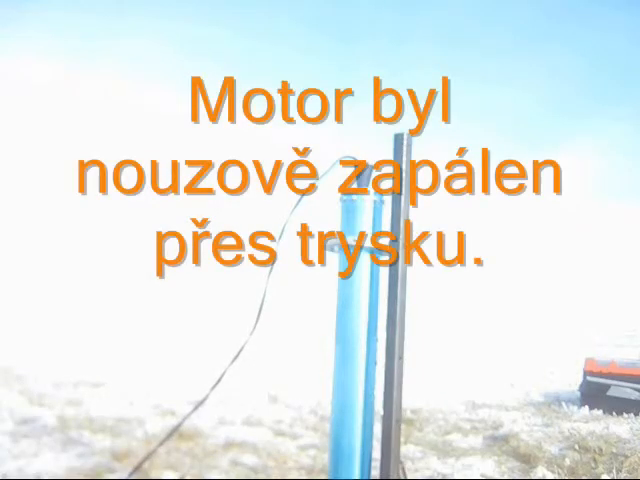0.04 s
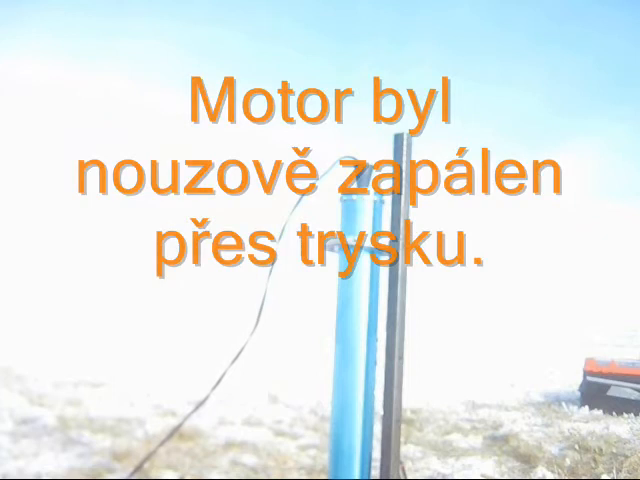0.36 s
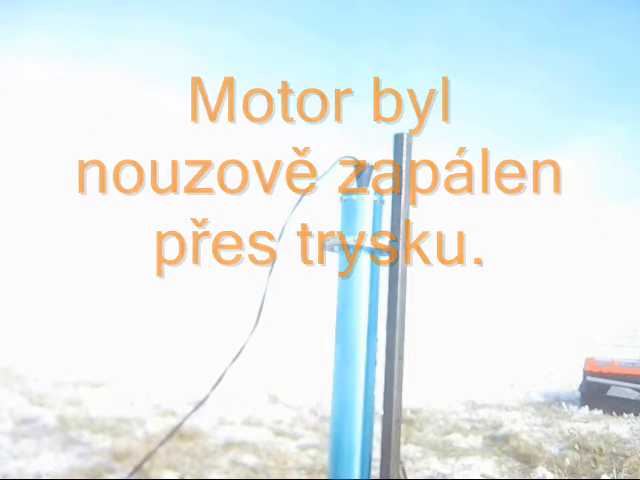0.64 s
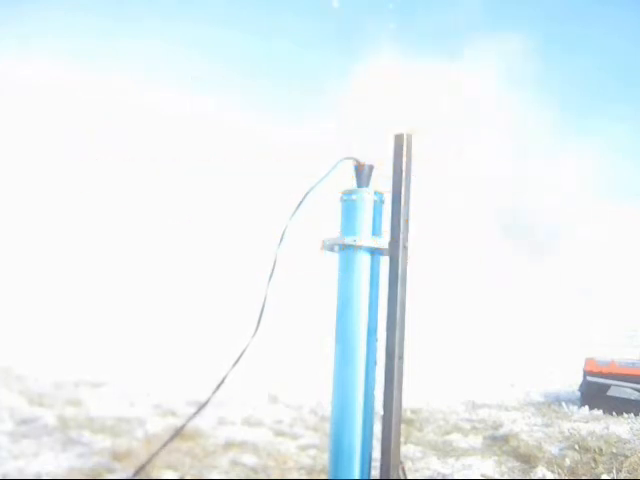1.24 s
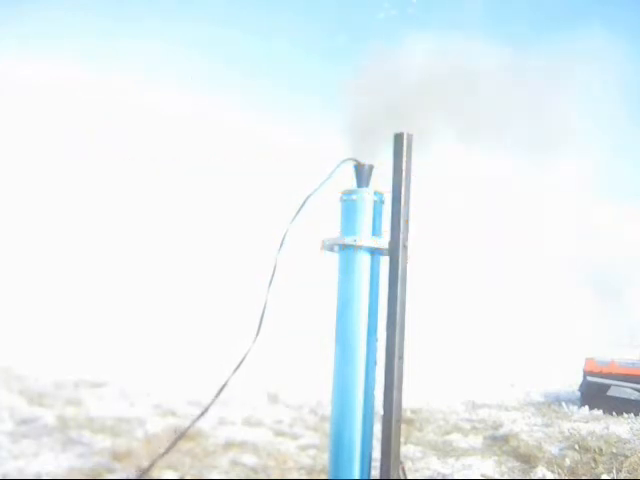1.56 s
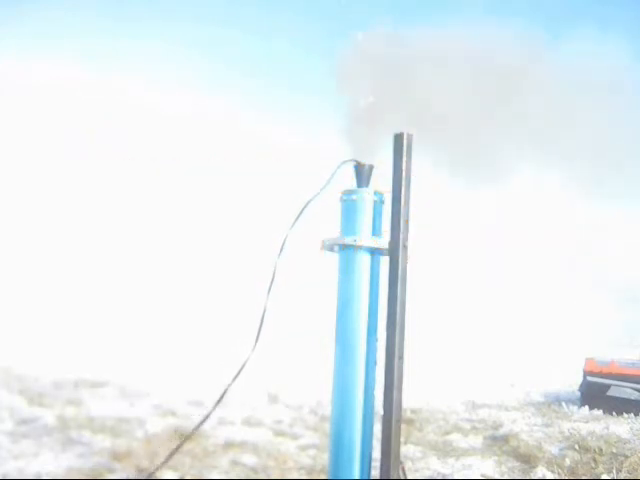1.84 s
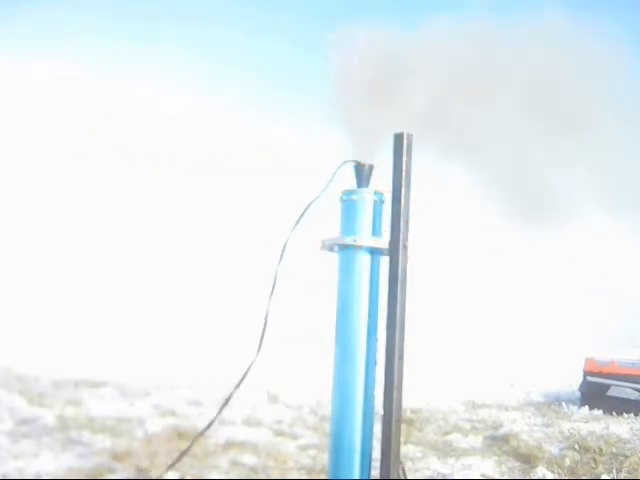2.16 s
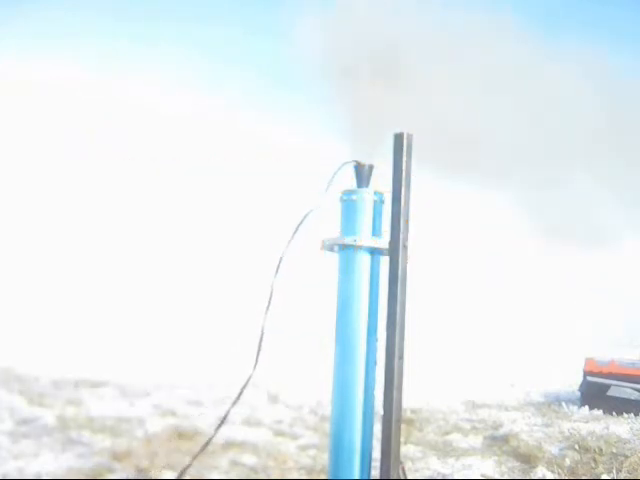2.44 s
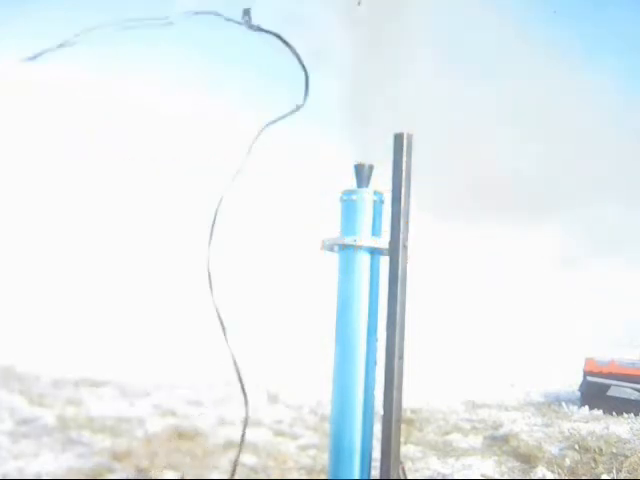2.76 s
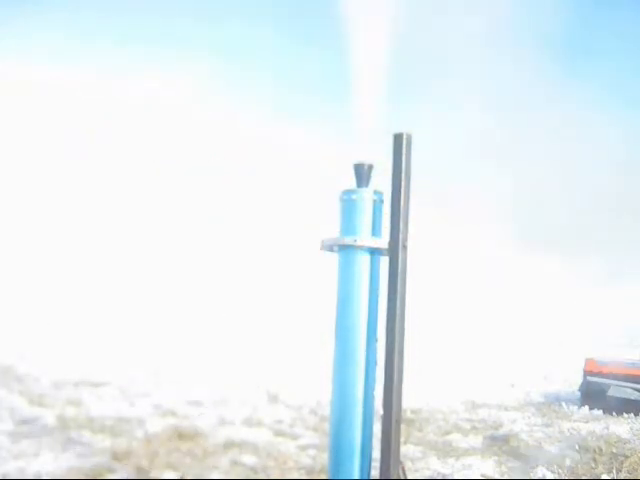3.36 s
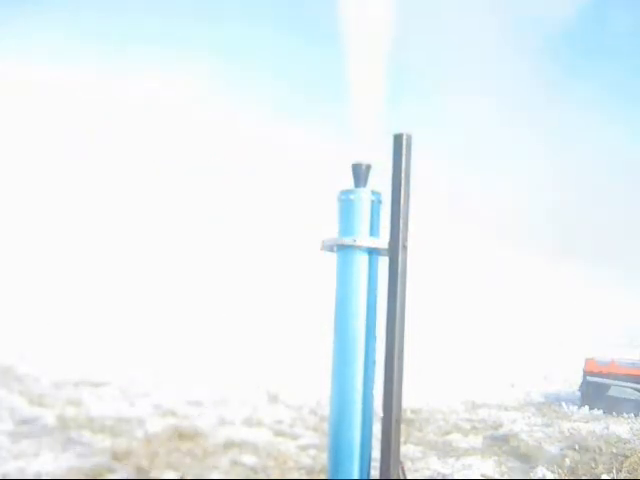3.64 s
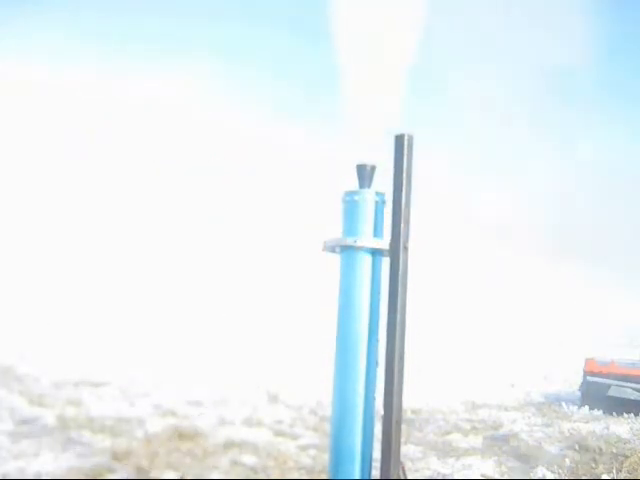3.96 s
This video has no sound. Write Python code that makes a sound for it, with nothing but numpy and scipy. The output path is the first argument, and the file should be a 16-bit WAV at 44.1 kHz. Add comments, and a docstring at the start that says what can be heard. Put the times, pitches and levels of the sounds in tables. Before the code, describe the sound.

A small rocket motor lights close to the microphone outdoors. After faint wind and a soft hollow rush, it thumps, sputters and crackles with sharp snaps, then hisses harder and opens into a loud, smooth roar.

```python
"""On an outdoor test stand, in a light wind, a small solid rocket motor lights close to a mono camera.
The igniter rushes softly inside the case. Gas breaks out with a thump, then spits and sputters through
the half-blocked nozzle with a low flutter. It hisses harder as the igniter wire is blown out, and opens
into a full, smooth jet. Most layers are noise, given a tone by one table and a loudness by another."""
import sys
import numpy as np
from scipy import signal
from scipy.fft import rfft, irfft
from scipy.io import wavfile
from scipy.ndimage import uniform_filter1d

SR = 44100
rng = np.random.default_rng(int(sys.argv[2]) if len(sys.argv) > 2 else 0)


def master(y):
    """Save y as 16-bit WAV."""
    cut = np.clip(np.atleast_2d(y).T, -1, 1)
    pcm = np.round(cut * 32767)  # scale
    wavfile.write(sys.argv[1], SR, pcm.astype(np.int16))


N = 176400
TIME = np.arange(N) / SR
HZ = np.maximum(np.arange(N // 2 + 1) * SR / N, 1)


def undb(db):
    """Turn decibels into a number to multiply by."""
    return 10 ** (np.asarray(db) / 20)


def unit(x):
    """Scale a signal to a standard strength (rms 1)."""
    return x / np.std(x)


def curve(rows):
    """Loudness that follows (time_s, level_db) rows and fades by 200 dB a second outside them."""
    times, levels_db = np.array(rows, float).T
    outside_s = np.abs(TIME - np.clip(TIME, times[0], times[-1]))
    return undb(np.interp(TIME, times, levels_db) - 200 * outside_s)


def swell(peak_s, rise_db_per_s, fall_db_per_s, hold_s=0):
    """Loudness that rises to 1 at peak_s, stays there for hold_s, then falls."""
    before_s = np.maximum(peak_s - TIME, 0)
    after_s = np.maximum(TIME - peak_s - hold_s, 0)
    return undb(-rise_db_per_s * before_s - fall_db_per_s * after_s)


def colour(x, tone, resonances=()):
    """Filter a sound by (pitch_hz, gain_db) rows, adding a peak for each resonance."""
    pitches, gains_db = np.array(tone, float).T
    shape_db = np.interp(np.log(HZ), np.log(pitches), gains_db)
    for pitch_hz, width_hz, lift_db in resonances:
        shape_db += lift_db / (1 + (2 * (HZ - pitch_hz) / width_hz) ** 2)
    # Folding the cepstrum makes the filter ring after a click, never before it.
    cepstrum = irfft(np.log(undb(shape_db)), N)
    cepstrum[1:N // 2] *= 2
    cepstrum[N // 2 + 1:] = 0
    return irfft(rfft(x) * np.exp(rfft(cepstrum)), N)


def wobble(spread_db, rate_hz):
    """Loudness that wanders smoothly up and down at random."""
    window = max(int(SR / rate_hz), 1)
    smoothed = uniform_filter1d(rng.standard_normal(N), window)
    return undb(spread_db * unit(uniform_filter1d(smoothed, window)))


def rush(tone, resonances=()):
    """Swirling air: noise with the given tone, at standard strength."""
    return unit(colour(rng.standard_normal(N), tone, resonances))


# Tone of the background hiss: pitch_hz, gain_db
HISS_TONE = [(40, 10.5), (350, 5), (1100, -0.5), (2000, 1), (3100, -1.5), (5000, -2.5), (8000, -7.5),
             (9700, -13)]
# Narrow peaks that whine in the hiss: pitch_hz, width_hz, lift_db
WHINE_PEAKS = [(3050, 60, 8), (3195, 60, 7.5), (7850, 60, 8), (7990, 60, 8), (10350, 160, 13.5)]

def background_hiss():
    """A faint, steady hiss with a thin whine in it."""
    return undb(-49.5) * rush(HISS_TONE, WHINE_PEAKS)


# Strength of the gusts: time_s, level_db
GUST_LEVELS = [(0, -52), (.08, -43), (.2, -46.5), (.27, -37), (.33, -47), (.45, -49.5), (.57, -37.5),
               (.71, -37), (.77, -45.5), (.83, -35.5), (.88, -35), (.92, -39), (.97, -29.5), (1.02, -43)]
# Tone of the wind's rumble: pitch_hz, gain_db
WIND_TONE = [(20, -8), (45, 5), (72, 2), (150, -4.5), (280, -20), (500, -18.5), (1500, -38), (10000, -85)]

def wind(lull_s=1.2, lull_db=-59):
    """Gusts buffet the microphone, then settle into a lull."""
    gusts = curve(list(GUST_LEVELS) + [(lull_s, lull_db), (N / SR, lull_db)])
    return gusts * rush(WIND_TONE)


# Strength of the burning inside the case: time_s, level_db
IGNITER_LEVELS = [(0, -53.5), (.12, -48), (.25, -45.5), (.37, -47.5), (.44, -51.5), (.62, -56),
                  (.69, -46.5), (.76, -56), (.85, -44.5), (1.0, -37.5), (1.44, -38.5), (1.53, -34),
                  (1.59, -39), (1.66, -33), (1.8, -39.5), (2.0, -41.5), (2.13, -44), (2.3, -36.5),
                  (2.58, -45), (2.8, -39), (3.05, -41)]
# Small puffs from the igniter: peak_s, level_db
IGNITER_PUFFS = [(0.713, -37.5), (0.787, -40.5), (0.916, -34.5), (1.072, -20.5)]
# Hollow tone of the burning: pitch_hz, gain_db
IGNITER_TONE = [(200, -32), (400, -18.5), (520, -3.5), (650, 1.5), (800, -5.5), (1100, -17), (2500, -27),
                (10000, -58)]

def igniter():
    """The igniter burns inside the case with a hollow rush and a few puffs."""
    puffs = sum(undb(level_db) * swell(peak_s, rise_db_per_s=4000, fall_db_per_s=503)
                for peak_s, level_db in IGNITER_PUFFS)
    return np.hypot(curve(IGNITER_LEVELS), puffs) * rush(IGNITER_TONE)


# Tone of the fuel catching fire: pitch_hz, gain_db
CATCH_TONE = [(150, -6), (600, -6), (1200, -1), (2300, -2.5), (3400, -6), (5000, -29), (8000, -11.5),
              (10500, -12.5)]

def fuel_catching():
    """The solid fuel catches with a rush that swells until the nozzle starts to spit."""
    return undb(-35) * swell(peak_s=1.045, rise_db_per_s=65, fall_db_per_s=250) * rush(CATCH_TONE)


THUMP_AGE_S = np.maximum(TIME - 1.037, 0)  # time since the gas broke out
# Tone of the first bark of gas: pitch_hz, gain_db
BARK_TONE = [(100, 3), (300, 5), (800, 1), (1800, -11), (3000, -6), (6000, -21), (10000, -19)]

def thump(pitch_hz=101, decay_s=0.006):
    """Gas first breaks out with one fast-dying swing of pressure and a short bark."""
    swing = -np.sin(2 * np.pi * pitch_hz * THUMP_AGE_S) * np.exp(-THUMP_AGE_S / decay_s)
    bark = swell(peak_s=1.032, rise_db_per_s=3000, fall_db_per_s=900) * rush(BARK_TONE)
    return undb(-13.5) * swing + undb(-21) * bark


# Tone of the low flutter: pitch_hz, gain_db
FLUTTER_TONE = [(25, -16), (45, -10), (65, 2), (100, 1.5), (160, 0.5), (230, -6), (380, -17), (480, -9),
                (640, -8), (800, -22.5), (1500, -31), (10000, -60)]
# Deeper tone just before it chokes off: pitch_hz, gain_db
CHOKE_TONE = [(25, -18), (55, -9), (76, 3), (110, -7), (200, -22), (1000, -58), (10000, -90)]

def chuffing(growth_db_per_s=2.5, fall_db_per_s=481):
    """The first unsteady burning flutters low, deepens, and chokes off with one last puff."""
    slopes = dict(rise_db_per_s=1500, fall_db_per_s=fall_db_per_s)
    burning = swell(peak_s=1.033, hold_s=0.368, **slopes)
    last_puff = undb(-7.5) * swell(peak_s=1.463, **slopes)
    growth = undb(growth_db_per_s * THUMP_AGE_S)
    flutter = growth * (burning + last_puff) * rush(FLUTTER_TONE)
    deepening = swell(peak_s=1.35, hold_s=0.051, rise_db_per_s=250, fall_db_per_s=fall_db_per_s)
    return undb(-27.5) * flutter + undb(-28.5) * deepening * rush(CHOKE_TONE)


# Tone of the crackle: pitch_hz, gain_db
CRACKLE_TONE = [(300, -10), (2200, -16.5), (3600, -1), (5200, 3), (7500, -3), (10000, -9)]

def crackle(clicks_per_s=1300, spread_db=1.5):
    """Tiny clicks of uneven size swell and fade in bunches."""
    sizes = undb(spread_db * np.minimum(rng.exponential(size=N), 4))
    fires = rng.random(N) < clicks_per_s / SR
    clicks = fires * sizes * np.sign(rng.standard_normal(N))
    return unit(colour(clicks * wobble(spread_db=3, rate_hz=70), CRACKLE_TONE))


# Strength of the gas flow through the half-blocked nozzle: time_s, level_db
FLOW_LEVELS = [(.93, -51), (1.0, -41), (1.025, -34.5), (1.035, -26), (1.07, -25), (1.085, -25),
               (1.105, -28.5), (1.125, -29), (1.19, -26), (1.25, -29.5), (1.3, -25.5), (1.36, -28.5),
               (1.413, -25), (1.42, -33.5), (1.48, -29.5), (1.535, -24.5), (1.56, -25), (1.585, -30.5),
               (1.65, -25), (1.69, -26.5), (1.72, -22.5), (1.79, -23), (1.83, -24.5), (1.92, -22.5),
               (1.965, -25.5), (1.99, -23), (2.06, -25.5), (2.26, -23), (2.295, -26.5), (2.33, -23.5),
               (2.54, -23.5), (2.565, -24), (2.605, -21.5), (2.65, -23), (2.72, -21.5), (2.755, -24),
               (2.78, -22), (2.84, -24.5), (2.95, -27.5), (3.15, -53)]
# Tone of that flow: pitch_hz, gain_db
FLOW_TONE = [(60, -20), (250, -16.5), (390, -18.5), (520, -10), (740, -4), (1020, -7.5), (1400, -4.5),
             (1800, -4.5), (2550, -4), (3500, -1), (4500, -6), (5500, -9.5), (6500, -7.5), (7500, -7),
             (8400, -10.5), (10500, -21)]
# Pitches at which gas rings in the nozzle and case: pitch_hz, width_hz, lift_db
NOZZLE_RINGS = [(690, 240, 3), (1440, 500, 4), (2154, 320, 5), (2970, 300, 1.5), (3854, 300, 5),
                (4410, 130, 5), (6580, 310, 3.5), (7200, 240, 7), (9020, 190, 4.5)]

def sputter():
    """Uneven gas and bunches of crackle make the half-blocked nozzle ring."""
    gas = unit(rng.standard_normal(N) * wobble(spread_db=1.1, rate_hz=297))
    flow = (gas + undb(-5) * crackle()) * wobble(spread_db=0.17, rate_hz=47.2)
    return curve(FLOW_LEVELS) * unit(colour(flow, FLOW_TONE, NOZZLE_RINGS))


# Single spits of slag (burnt fuel): start_s, level_db
SLAG_SPITS = [(1.0123, -11.5), (1.015, -14), (1.016, -16), (1.2115, -23), (1.711, -9), (2.0195, -30),
              (2.3437, -4), (2.644, -11), (2.7665, -9)]

def spits():
    """Bits of slag snap out, ringing the nozzle just as the gas does."""
    kicks = np.zeros(N)
    for start_s, level_db in SLAG_SPITS:
        kicks[int(start_s * SR)] += undb(level_db)
    snaps = colour(kicks, FLOW_TONE, NOZZLE_RINGS)
    return snaps * kicks.max() / np.abs(snaps).max()


# Strength of the hiss as the nozzle clears: time_s, level_db
CLEARING_LEVELS = [(2.78, -42), (2.84, -29.5), (2.885, -18), (2.95, -21.5), (2.98, -17.5), (3.1, -16),
                   (3.2, -16.5), (3.29, -19.5), (3.4, -26.5), (3.7, -45)]
# Bright tone of that hiss: pitch_hz, gain_db
CLEARING_TONE = [(60, -25), (300, -22), (700, -10), (950, -10), (1500, -5.5), (2150, -2.5), (2500, -4),
                 (3400, 0), (4200, -2.5), (5500, -5.5), (7000, -6.5), (7700, -6.5), (8500, -8.5),
                 (10500, -25)]

def nozzle_clearing():
    """Gas hisses freely as the igniter wire is blown out of the nozzle."""
    hiss = rush(CLEARING_TONE, NOZZLE_RINGS) * wobble(spread_db=0.5, rate_hz=200)
    return curve(CLEARING_LEVELS) * hiss


# Tone of the deep surge: pitch_hz, gain_db
SURGE_TONE = [(25, -22), (45, -5), (72, -2), (140, 3.5), (300, 0), (500, -1), (800, -4.5), (1500, -13),
              (4000, -21), (10000, -43)]

def pressure_surge():
    """A deep rush swells as the chamber comes up to pressure."""
    loudness = swell(peak_s=3.212, hold_s=0.08, rise_db_per_s=100, fall_db_per_s=55)
    return undb(-23) * loudness * rush(SURGE_TONE)


# Strength of the full jet: time_s, level_db
ROAR_LEVELS = [(2.85, -48), (3.05, -29), (3.16, -24), (3.25, -18), (3.38, -16.5), (3.7, -16.5), (4.0, -17)]
# Broad tone of the full jet: pitch_hz, gain_db
ROAR_TONE = [(18, -49), (30, -6), (104, -2.5), (295, -3), (367, -3.5), (479, -2), (596, -4.5), (760, -1.5),
             (1360, -2.5), (1660, -2), (3110, -0.5), (7650, -6.5), (10000, -17), (13000, -31),
             (22000, -120)]

def jet():
    """The nozzle clears, pressure surges, and the exhaust settles into a broad roar."""
    exhaust = nozzle_clearing() + pressure_surge() + curve(ROAR_LEVELS) * rush(ROAR_TONE)
    return exhaust * wobble(spread_db=0.28, rate_hz=120)


def scene():
    """Everything reaches one microphone, so both channels are the same."""
    outdoors = wind() + background_hiss()
    motor = igniter() + fuel_catching() + thump() + chuffing() + sputter() + spits() + jet()
    mono = outdoors + motor
    return np.array([mono, mono])


def record(dry):
    """The camera rounds off peaks and holds every second sample, which mirrors the treble upward."""
    fade_from_hz, fade_to_hz, top_hz = 10230, SR / 4, 15750
    rounded = 0.63 * np.tanh(dry / 0.67)
    hz = np.arange(N + 1) * SR / (2 * N)
    treble_fade = np.clip((fade_to_hz - hz) / (fade_to_hz - fade_from_hz), 0, 1)
    dulled = irfft(rfft(rounded, 2 * N) * treble_fade)
    held = np.repeat(dulled[:, :N:2], 2, axis=1)
    top_cut = signal.ellip(12, .1, 90, top_hz, fs=SR, output="sos")
    return signal.sosfilt(top_cut, held)


dry = scene()
out = record(dry)
master(out)
```